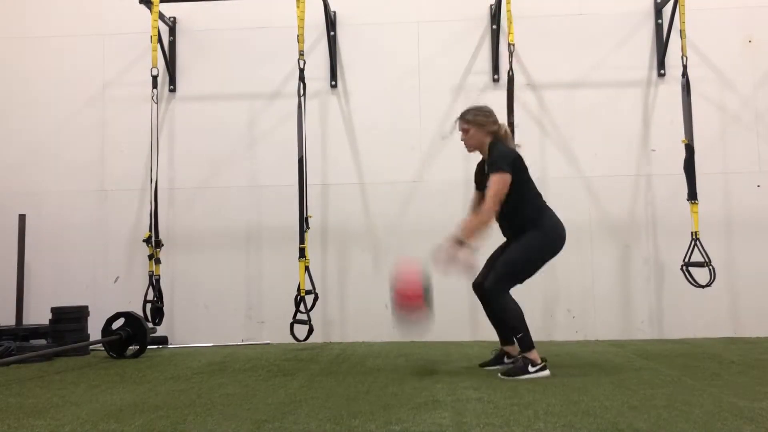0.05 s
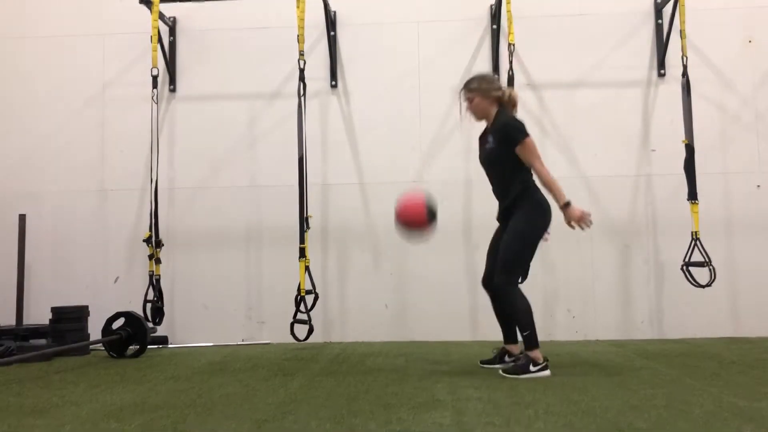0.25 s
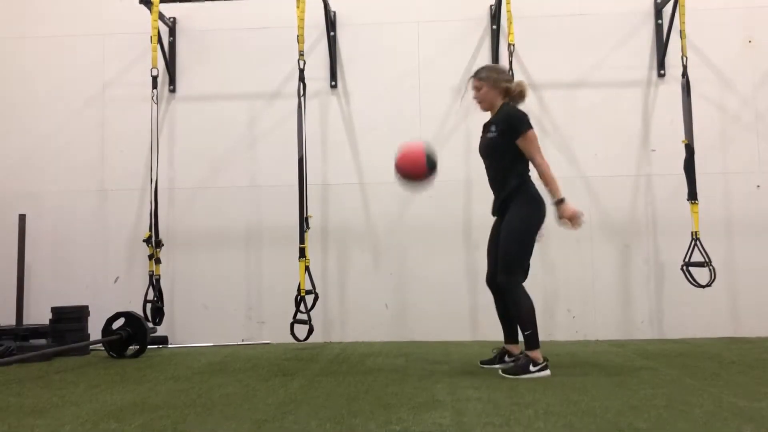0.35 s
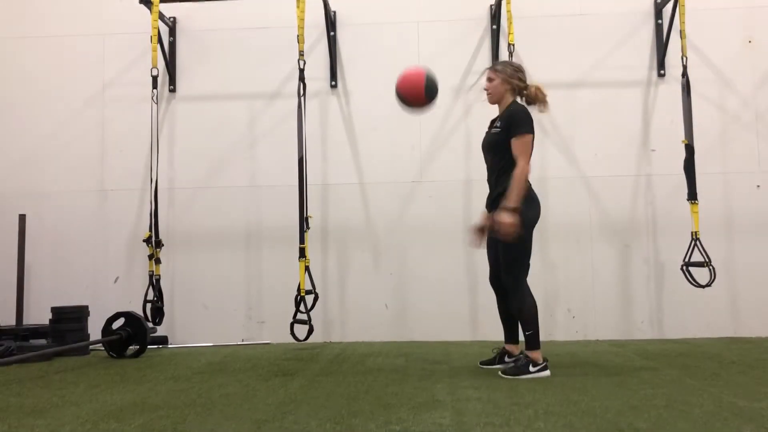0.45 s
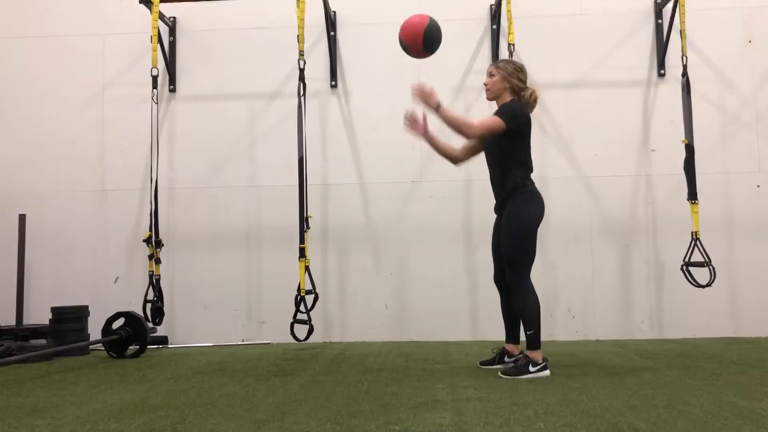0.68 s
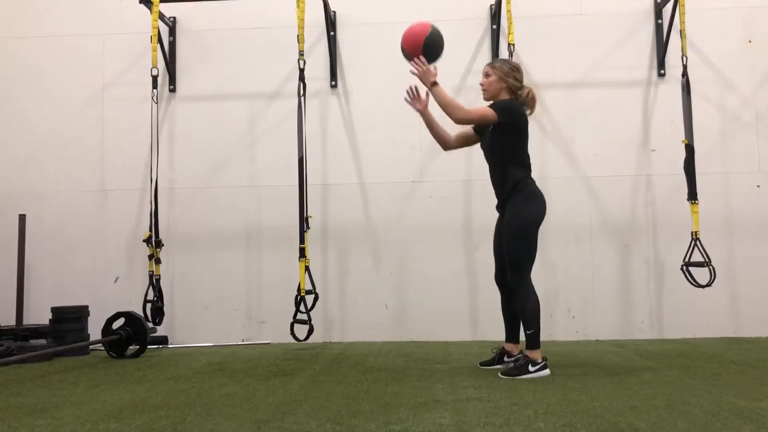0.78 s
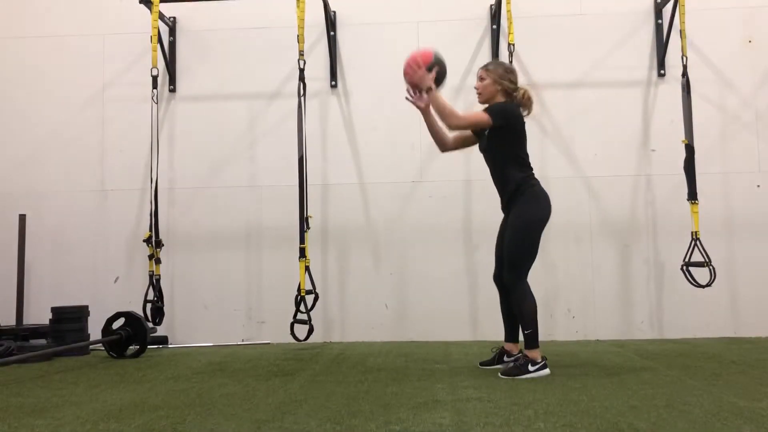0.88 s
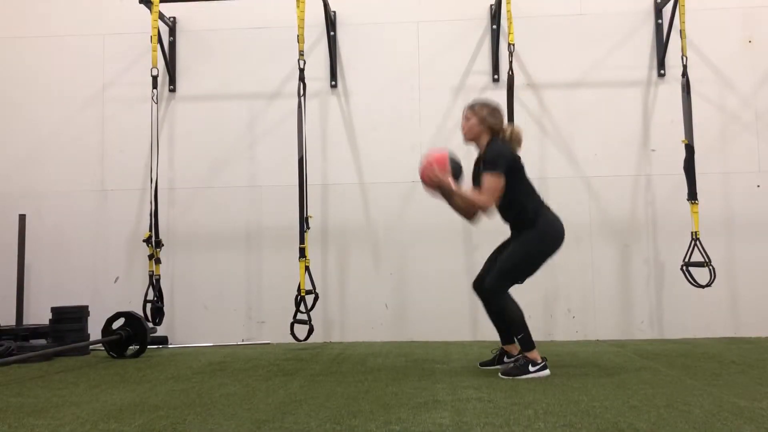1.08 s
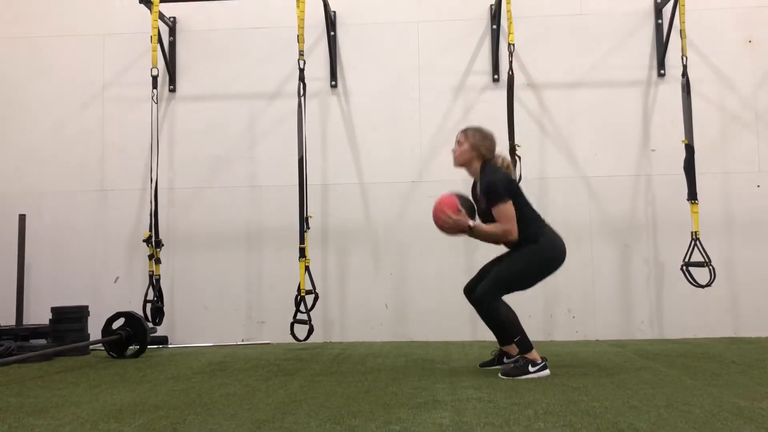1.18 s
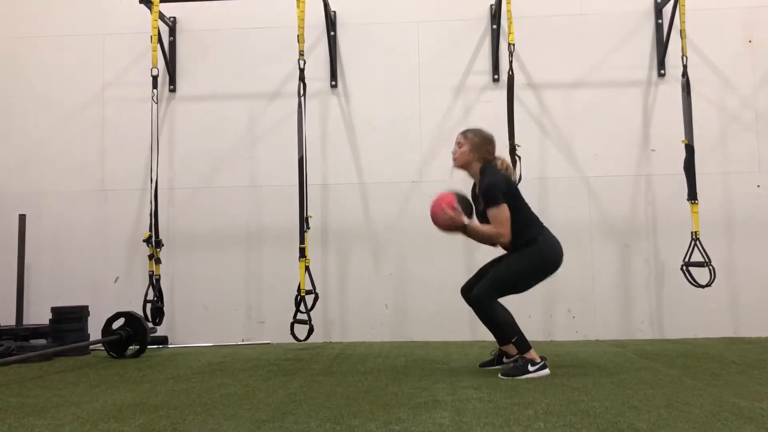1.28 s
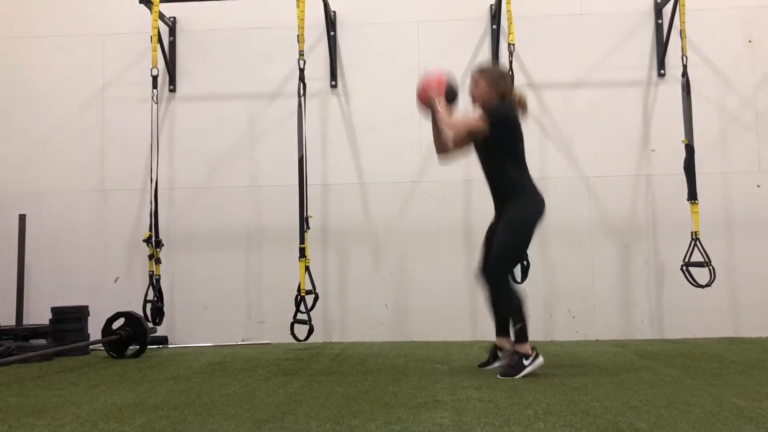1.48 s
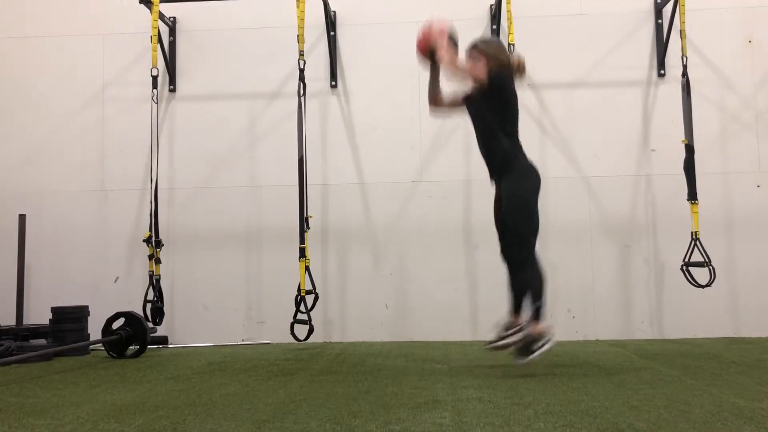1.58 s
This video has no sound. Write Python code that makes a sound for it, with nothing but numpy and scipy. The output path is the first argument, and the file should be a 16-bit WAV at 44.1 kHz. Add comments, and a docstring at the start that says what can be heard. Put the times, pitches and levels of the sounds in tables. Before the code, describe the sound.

A heavy medicine ball slams onto turf with a low boom echoing through a gym.

```python
"""A medicine ball is slammed onto gym turf, with ventilation humming and hissing throughout.
First the throw: a faint swish over soft thuds of feet. At 0.2 s the ball lands with a slap,
a crackle of fibres and a thump whose pitch drops as the ball squashes. Walls and ceiling throw
it back and the hall booms on. Two more soft thuds follow, and at last a faint rustle of clothing."""
import sys
import numpy as np
from scipy import signal
from scipy.fft import rfft, irfft
from scipy.io import wavfile

SR = 44100
rng = np.random.default_rng(int(sys.argv[2]) if len(sys.argv) > 2 else 0)


def unload_wav(signal):
    """Save mono or channel-first audio to the path in sys.argv[1] as 16-bit WAV at rate SR, clipped to [-1, 1]."""
    wavfile.write(
        sys.argv[1],
        SR,
        np.round(np.clip(np.atleast_2d(signal).T, -1, 1) * 32767).astype(np.int16),
    )


N = 72765
SLAM_S = .2049  # the ball first touches the turf
HALL_RISE_S = .01


def undb(db):
    """Decibels to gain."""
    return 10 ** (np.asarray(db) / 20)


def on_log(hz, points):
    """Read (Hz, value) points on a log-frequency axis."""
    point_hz, values = np.array(points, float).T
    return np.interp(np.log(np.maximum(hz, 1)), np.log(point_hz), values)


def bins():
    """Frequencies of the spectrum bins in Hz."""
    return np.arange(N // 2 + 1) * SR / N


def noise(gain):
    """Noise of rms 1, shaped by a relative gain per bin."""
    phases = np.exp(2j * np.pi * rng.random(len(gain)))
    wave = irfft(gain * phases, N)
    return wave / np.sqrt(np.mean(wave ** 2))


def coloured(points):
    """Noise of rms 1, shaped by an EQ curve of (Hz, dB) points."""
    return noise(undb(on_log(bins(), points)))


def since(start):
    """Seconds since a moment, zero before it."""
    return np.maximum(np.arange(N) / SR - start, 0)


def strike(age, rise, t60):
    """Envelope with a smooth attack and a decay of 60 dB in t60 seconds."""
    return (1 - np.exp(-(age / rise) ** 2)) * np.exp(-np.log(1000) * age / t60)


def delayed(x, lag):
    """The same sound, lag seconds later."""
    return np.interp(np.arange(N) - lag * SR, np.arange(N), x, left=0)


def ring(modes, start, rise):
    """Decaying tones from (Hz, dB, t60) rows, all struck at one moment."""
    age = since(start)
    return sum(undb(db) * np.sin(2 * np.pi * hz * age) * strike(age, rise, t60) for hz, db, t60 in modes)


def ventilation():
    """The room tone: a steady hiss over a low hum that wavers, swells and sinks."""
    # The EQ of the steady room hiss, as the microphone colours it.
    # Each row: frequency in Hz, relative level in dB.
    hiss_eq = [(20, -9), (35, -3.5), (60, -6.5), (100, 2), (160, -5.5), (260, -7.5), (420, -13),
               (700, -12.5), (1000, -14.5), (1800, -18.5), (2150, -16), (2400, -11.5), (2650, -18),
               (3000, -31), (3600, -38), (4600, -40), (6200, -50), (10000, -52.5), (15500, -57)]
    # The hum's fader moves. Each row: time in seconds, level in dB.
    hum_fader = [(0, -46), (.05, -41.5), (.1, -56), (0.171, -40.5), (.6, -37), (.85, -59), (.9, -43),
                 (1.11, -50), (1.17, -72), (1.22, -47.5), (1.32, -38.5), (1.47, -58), (1.54, -40),
                 (1.65, -43)]
    hiss_db, hum_hz, drift_hz = -44, 61.9, 2.3
    pitch = hum_hz + drift_hz * noise(np.exp(-bins() / 5))
    level = undb(np.interp(since(0), *np.array(hum_fader).T))
    hum = np.sqrt(2) * level * np.sin(2 * np.pi * np.cumsum(pitch) / SR)
    return undb(hiss_db) * coloured(hiss_eq) + hum


def hall(start):
    """The hall's diffuse boom from a moment on; every band dies at its own rate."""
    # The boom's bass-heavy EQ. Each row: frequency in Hz, relative level in dB.
    boom_eq = [(25, -33), (42, -16), (58, -4.5), (80, -6.5), (120, -1.5), (165, 1.5), (220, -0.5), (275, 4),
               (360, -2.5), (470, -11), (560, -10.5), (800, -19), (1200, -29.5), (2400, -39.5), (3500, -56),
               (7000, -67)]
    # The length of the reverb tail. Each row: frequency in Hz, t60 in seconds.
    tail_times = [(60, 0.89), (150, 1.28), (270, 1.575), (450, 1.25), (1000, 1.85), (3000, 1.3),
                  (8000, 0.39)]
    spectrum, age = rfft(coloured(boom_eq)), since(start)
    centres = np.geomspace(40, 10000, 12)
    boom = 0
    for hz, solo in zip(centres, np.eye(len(centres))):
        band_gain = on_log(bins(), list(zip(centres, solo)))
        band = irfft(spectrum * band_gain, N)
        boom = boom + band * strike(age, HALL_RISE_S, on_log(hz, tail_times))
    return boom


def rustles():
    """Cloth slides faintly as the arms reach up."""
    # The EQ of sliding cloth. Each row: frequency in Hz, relative level in dB.
    cloth_eq = [(800, -10), (2400, 7), (3200, 4), (4500, -6), (6200, -20), (15500, -38)]
    # The cloth cues. Each row: start in seconds, level in dB, rise and t60 in seconds.
    cues = [(1.02, -60.5, 0.025, 1), (1.57, -55, 0.042, 0.51)]
    envelope = sum(undb(db) * strike(since(start), rise, t60) for start, db, rise, t60 in cues)
    return coloured(cloth_eq) * envelope


def swish():
    """A soft hiss that swells with the throw, holds and fades."""
    # The EQ of the throw. Each row: frequency in Hz, relative level in dB.
    swish_eq = [(200, -10.5), (500, -3.5), (800, 1), (1400, 0.5), (1900, -3), (2350, 6.5), (3100, -11),
                (3900, -10), (4600, -19), (5300, -24), (8000, -39), (15500, -44)]
    level_db, swell_s, hold_s, fade_db_per_s = -43.5, .013, .092, 35
    swell = .5 + .5 * np.minimum(since(0) / swell_s, 1)
    level = undb(level_db - fade_db_per_s * since(swell_s + hold_s))
    return coloured(swish_eq) * swell * level


def thuds():
    """Dull knocks of landing feet and catching hands; each stirs the hall a little."""
    # The foot and hand cues. Each row: start in seconds, level in dB, pitch in Hz,
    # t60 in seconds, reverb level in dB.
    cues = [(.038, -26.5, 219, 0.09, -45.5), (.072, -28, 108.6, 0.14, -57.5), (.12, -28, 109.5, .12, -58.5),
            (0.16, -27.5, 100, 0.12, -58.5), (.424, -22, 95, .12, -54), (.882, -37.5, 259, 0.23, -41)]
    return sum(ring([(hz, db, t60)], start, rise=.0017) + undb(hall_db) * hall(start)
               for start, db, hz, t60, hall_db in cues)


def turf():
    """A brief fine hiss of crushed fibres while the ball presses and leaves."""
    level_db, contact_s, edge_s, low_cut_hz = -67.5, .053, .002, 5000
    age = since(SLAM_S)
    fibres = noise(1 / (1 + (low_cut_hz / (bins() + 1)) ** 2))
    gate = np.clip(np.minimum(age, contact_s + edge_s - age) / edge_s, 0, 1)
    return undb(level_db) * fibres * gate


def ball():
    """The thump falls in pitch as the contact patch grows; the shell smacks and rings at first touch."""
    # The EQ of the slap. Each row: frequency in Hz, relative level in dB.
    slap_eq = [(300, -10), (600, -2.5), (900, 6), (1500, -8.5), (2400, -7), (3200, -25), (4000, -18),
               (5200, -19.5), (6500, -45), (15500, -52)]
    # The rubber shell's brief ring. Each row: pitch in Hz, level in dB, t60 in seconds.
    shell_modes = [(549, -16.5, 0.034), (818, -13.5, 0.018), (1275, -26.5, 0.022)]
    touch_hz, settled_hz, squash_s = 1182, 165, .0024
    thump_db, slap_db = 7.5, -25
    age = since(SLAM_S)
    squash = 1 - np.exp(-age / squash_s)
    cycles = settled_hz * age + (touch_hz - settled_hz) * squash_s * squash
    thump = -np.sin(2 * np.pi * cycles) * strike(age, rise=.0059, t60=.053)
    slap = coloured(slap_eq) * strike(since(SLAM_S + .0016), rise=.001, t60=.022)
    shell = ring(shell_modes, SLAM_S + .0018, rise=.001)
    return undb(thump_db) * thump + undb(slap_db) * slap + shell


def slam():
    """The ball hits the turf; the hall answers with duller echoes, standing waves and a boom."""
    # Slapback from walls and ceiling. Each row: delay in seconds, gain in dB.
    reflections = [(0.0139, -7), (0.0171, -11), (0.0359, -12), (0.049, -5), (0.0651, -12), (.0742, -11.5),
                   (0.0798, -8), (0.1585, -25), (0.2234, -16.5)]
    # The hall's standing waves. Each row: pitch in Hz, level in dB, t60 in seconds.
    hall_modes = [(59, -21, 1.04), (98.4, -21.5, 0.36), (117.6, -21.5, .9), (156.6, -22, 1.3),
                  (169.6, -16.5, 0.97), (200, -17, 0.64), (230, -36.5, .6), (270.4, -22, 1.27),
                  (349.4, -20, 0.74), (424, -26.5, 1.1), (522, -30, 1), (627, -39, 1.6)]
    echo_cutoff_hz, boom_db = 900, -14
    direct = ball()
    dull = signal.sosfilt(signal.butter(1, echo_cutoff_hz, fs=SR, output="sos"), direct)
    echoes = sum(undb(db) * delayed(dull, lag) for lag, db in reflections)
    standing_waves = ring(hall_modes, SLAM_S, HALL_RISE_S)
    boom = undb(boom_db) * hall(SLAM_S)
    return direct + echoes + standing_waves + boom + turf()


def scene():
    """The mono mix: the slam up front, body sounds and room tone behind it."""
    return (slam() + thuds() + swish() + rustles() + ventilation())[None]


def record(dry):
    """The recorder rounds the highest peaks and cuts the top."""
    ceiling, top_hz = .85, 15750
    rounded = dry / (1 + (np.abs(dry) / ceiling) ** 8) ** (1 / 8)
    return signal.sosfilt(signal.ellip(10, .2, 80, top_hz, fs=SR, output="sos"), rounded)


dry = scene()
out = record(dry)
unload_wav(out)
```